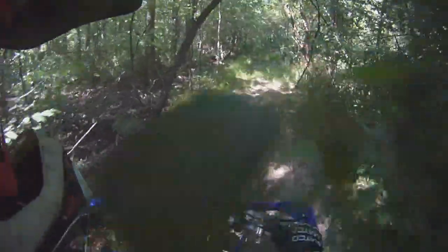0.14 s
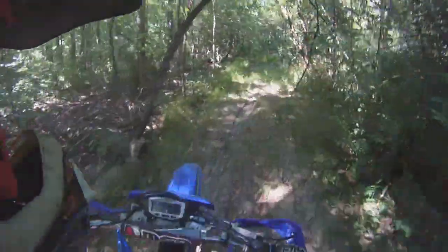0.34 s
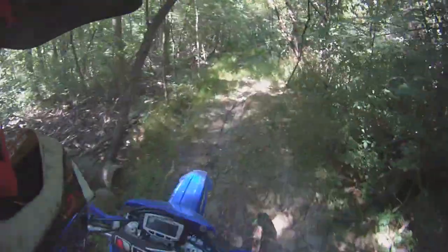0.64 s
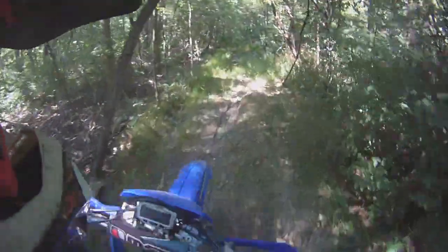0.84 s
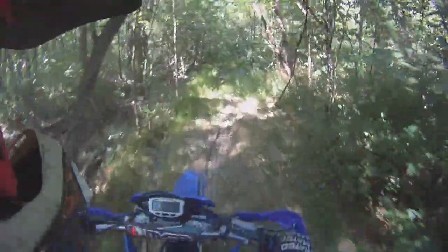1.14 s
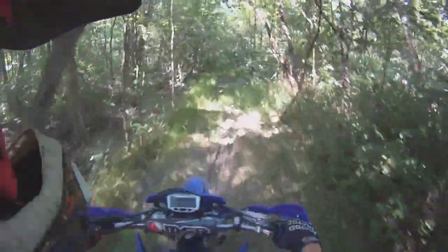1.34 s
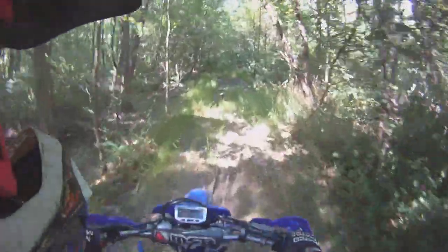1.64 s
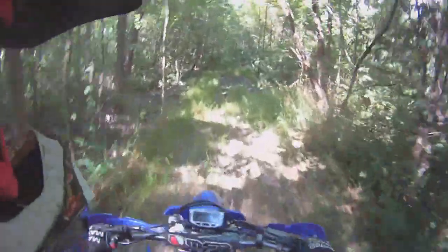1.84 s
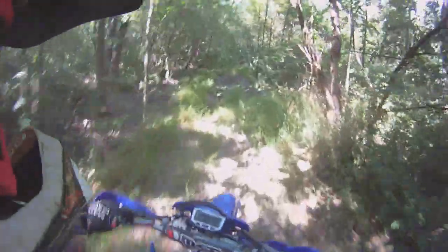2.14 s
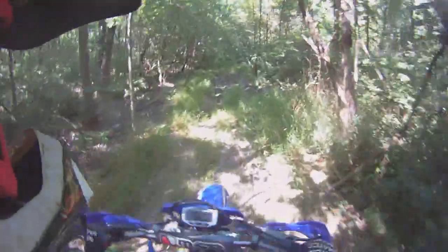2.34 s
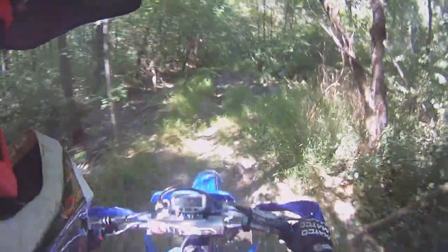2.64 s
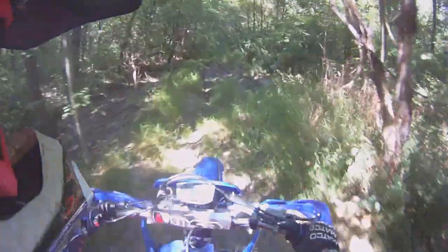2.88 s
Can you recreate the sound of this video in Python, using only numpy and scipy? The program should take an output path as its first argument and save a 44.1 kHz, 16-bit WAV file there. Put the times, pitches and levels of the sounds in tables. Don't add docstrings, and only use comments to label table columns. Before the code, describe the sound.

On a wooded trail, a dirt bike's throttle blip rises fast into a harsh clattering burr, eases, then drops to separate thudding beats with weak firings, a faint chain whine and a few light knocks; close helmet microphone.

```python
import sys
import numpy as np
from scipy import signal
from scipy.io import wavfile
from scipy.ndimage import uniform_filter1d

SR = 44100
rng = np.random.default_rng(int(sys.argv[2]) if len(sys.argv) > 2 else 0)


def nominal_scale(level):
    x = np.asarray(level, float) / 20
    return 10 ** x


def dump(signal):
    limited = np.clip(np.atleast_2d(signal).T, -1, 1)
    pcm = np.round(limited * 32767).astype(np.int16)
    wavfile.write(sys.argv[1], SR, pcm)


N = 132741


def rms_one(x):
    return x / np.sqrt(np.mean(x ** 2) + 1e-20)


def in_time(rows):
    s, *columns = np.transpose(rows)
    return [np.interp(np.arange(N) / SR, s, column) for column in columns]


def butter(x, order, hz, kind):
    return signal.sosfilt(signal.butter(order, hz, kind, fs=SR, output="sos"), x)


def resonance(x, hz, width_hz):
    r = np.exp(-np.pi * width_hz / SR)
    zeros = (1 - r * r) / 2 * np.array([1, 0, -1])
    poles = [1, -2 * r * np.cos(2 * np.pi * hz / SR), r * r]
    return signal.lfilter(zeros, poles, x + 1e-18)


def late(x, delay_s):
    return np.interp(np.arange(N) - delay_s * SR, np.arange(N), x, left=0)


def drift(rate_hz):
    r = np.exp(-2 * np.pi * rate_hz * 40 / SR)
    slow = signal.lfilter([1], [1, -2 * r, r * r], rng.standard_normal(N // 40 + 502))
    slow = rms_one(slow[500:])
    return np.interp(np.arange(N) / 40, np.arange(len(slow)), slow)


def marks(cycle, lead_s, spread_db):
    at = np.flatnonzero(np.diff(np.floor(cycle)) > 0)
    clicks = np.zeros(N)
    clicks[np.clip(at - int(lead_s * SR), 0, N - 1)] = nominal_scale(spread_db * rng.standard_normal(len(at)))
    return clicks


# start_s, firings_per_s
SPEED = [(0.0, 17.52), (0.149, 19.69), (0.292, 32.98), (0.348, 39.16), (0.453, 47.82), (0.541, 50.42),
         (0.661, 48.49), (0.894, 36.71), (1.065, 32.1), (1.337, 28.7), (1.472, 15.97), (1.518, 17.97),
         (1.835, 17.16), (1.977, 19.58), (2.348, 17.52), (2.411, 19.82), (2.445, 17.99), (3.01, 18.88)]
# start_s, clatter_db, exhaust_db, sharpness (of the thud, 0-1), ground_echo_ms
THROTTLE = [(0, -18.5, -5, 0.1, 3.9), (.13, -15, 0.5, 0.21, 3.35), (.25, -11, 3, 0.38, 4.5),
            (.4, -9.5, 2, 0.27, 3.3), (.6, -7, 1.9, 0.5, 3.57), (.78, -9.5, 0, 0.11, 3),
            (1.0, -10.5, 3, 0.49, 3.5), (1.33, -14.5, 1.7, 0.36, 3.6), (1.5, -20.5, -4, .2, 3.8),
            (2.0, -21.5, -5, 0.04, 3.7), (2.12, -22.5, -4, 0.12, 3.4), (2.4, -22, -2.5, 0.04, 3.6),
            (2.62, -18.5, -1.5, 0.16, 3.2), (3.01, -18.5, 0.3, 0.2, 3.4)]
# start_s, loss_db
MISFIRES = [
    (1.367, 5),
    (1.409, 8),
    (1.461, 12),
    (1.575, 9),
    (1.745, 4),
    (2.02, 4.5),
    (2.072, 6),
    (2.179, 5.5),
    (2.234, 11),
    (2.289, 3.5),
]


def engine():
    speed, = in_time(SPEED)
    cycle = -.277 + np.cumsum(speed) / SR
    clatter_db, exhaust_db, sharp, ground_ms = in_time(THROTTLE)
    sharp, t = np.clip(sharp, 0, 1), np.arange(N) / SR
    loss = sum(loss_db * (np.abs(t - s) < .012) for s, loss_db in MISFIRES)
    strength = nominal_scale(-loss)
    fired = marks(cycle, lead_s=.0015, spread_db=.6) * strength * nominal_scale(exhaust_db)
    pipe = exhaust(fired, sharp, speed, ground_ms / 1000)
    return pipe + nominal_scale(clatter_db) * clatter(cycle, strength, sharp)


def thud(clicks, hz, width_hz, level_db, delay_s):
    for _ in range(3):
        clicks = resonance(clicks, hz, width_hz)
    return -nominal_scale(level_db) * late(clicks, delay_s) * SR / width_hz


# hz, width_hz, level_db, delay_s, ground_gain, return_gain, second_return_gain
SOFT_THUD = (250, 390, -13.5, 0, .37, -.65, .27)
SHARP_THUD = (250, 720, -10, .0005, .65, -1.25, .42)


def exhaust(fired, sharp, speed, ground_s):
    fast = (speed / speed.max()) ** 4
    hot = 1 - .2 * (speed - speed.min()) / np.ptp(speed) * (1 - fast)
    header = thud(fired * fast, hz=620, width_hz=190, level_db=-19, delay_s=.005)
    airbox = thud(fired * fast, hz=190, width_hz=290, level_db=-16, delay_s=.0043)
    bark = thud(fired * fast, hz=880, width_hz=420, level_db=-12.5, delay_s=.002)
    boom = thud(fired * (1 - 1.5 * sharp), hz=62, width_hz=192, level_db=-25.5, delay_s=.002)
    push = thud(fired * sharp * (1 - fast), hz=164.5, width_hz=134, level_db=-18, delay_s=.002)
    out = header + airbox + bark - boom - push
    for share, (*voice, ground, back, again) in ((1 - sharp, SOFT_THUD), (sharp, SHARP_THUD)):
        direct = thud(fired * share, *voice)
        out += direct + ground * late(direct, ground_s)
        out += back * late(direct, .0056 * hot) + again * late(direct, .0106 * hot)
        out += -.9 * fast * late(direct, .0067)
    return out - sharp * (1 - fast) * butter(out, 2, 95, "low")


# pitch_hz, level_db (per Hz)
CLATTER = [
    (60, -7),
    (300, -5),
    (700, -13),
    (1300, -8),
    (2300, -17.5),
    (6000, -16.5),
    (9500, -47),
    (15000, -34),
]
# pitch_hz, width_hz, boost_db
BODY = [
    (626, 67, 5),
    (880, 320, 2.5),
    (1452, 73, 11.5),
    (1824, 31, 8.5),
    (3090, 174, 9.5),
    (3814, 170, 2.5),
    (4620, 145, 4),
    (4920, 100, 3),
    (5990, 540, 10.5),
    (7500, 240, 4),
]
# start_s, level_db (above 2.5 kHz)
INTAKE = [
    (0, -2.5),
    (.3, -0.5),
    (.6, 1.2),
    (.8, 2),
    (1.05, 2),
    (1.3, 0),
    (1.6, -0.9),
    (2.1, 1.2),
    (2.4, -.5),
    (3.01, -1.3),
]


def clatter(cycle, strength, sharp):
    beats = .95 * strength * marks(cycle, 0, spread_db=2.5) + .2 * marks(cycle + .5, 0, spread_db=2.5)
    decay = np.exp(-1 / (.009 * SR))
    gate = 1 + signal.lfilter([1], [1, -decay], uniform_filter1d(beats, size=80))

    ticks_per_s, tick_db, patchy_db = 1500, -2.5, .94
    ticks = (rng.random(N) < ticks_per_s / SR) * rng.standard_normal(N)
    ticks = ticks * nominal_scale(1.94 * rng.exponential(1, N))
    white = rng.standard_normal((2, N)) + nominal_scale(tick_db) * rms_one(ticks)

    out, together = 0, drift(8.0)
    edges = 45 * 2 ** np.arange(0, 8.6, .5)
    hz, level_db = np.transpose(CLATTER)
    for k, (low, high) in enumerate(zip(edges, edges[1:])):
        band = butter(white[k % 2], 2, [low, high], "band")
        colour_db = np.interp(np.log(low * high) / 2, np.log(hz), level_db)
        out = out + band * nominal_scale(colour_db + patchy_db * (.72 * together + drift(27.6)))

    for hz, width_hz, boost_db in BODY:
        out = out + (nominal_scale(boost_db) - 1) * resonance(out, hz, width_hz)
    intake_db, = in_time(INTAKE)
    out += (nominal_scale(intake_db) - 1) * butter(out, 2, 2500, "high")
    out += (nominal_scale(-10 * sharp) - 1) * resonance(out, 750.0, 600.0)
    return butter(rms_one(gate) * rms_one(out), 4, 560, "high")


# start_s, peak_db, ring_t60_s, pitch_hz
KNOCKS = [(0.0302, 4, 0.019, 1450), (0.04, 7.5, 0.063, 1395), (.043, -10.5, 0.065, 845),
          (.058, 2.5, 0.0067, 1600), (0.075, -3, 0.078, 1490), (0.153, -7, .008, 4000),
          (0.186, 0.5, 0.055, 1480), (0.207, -1, 0.17, 1370), (.238, 2, 0.059, 1780), (.255, 0, 0.11, 1740),
          (0.272, 0, 0.11, 1540), (0.311, -1, 0.017, 1450), (.34, 0.5, 0.042, 1600),
          (.358, -1.5, 0.033, 3770), (.388, -3.5, 0.067, 1380), (2.217, -15, 0.033, 815),
          (2.403, -11, 0.022, 1460), (2.567, -9, 0.052, 1480)]


def knocks():
    out, t = np.zeros(N + SR), np.arange(SR // 8) / SR
    for s, peak_db, t60, hz in KNOCKS:
        puff = rng.standard_normal(len(t)) * nominal_scale(-60 * t / t60)
        width_hz = hz / 5 if hz > 1000 else hz / 10
        ring = resonance(resonance(puff, hz, width_hz), hz, hz / 2)
        if hz > 1000:
            ring += .34 * resonance(resonance(puff, .584 * hz, 370.0), .54 * hz, 390.0)
        crack = nominal_scale(-21) * resonance(puff, 2300.0, 2100.0)
        start = int(s * SR)
        out[start:start + len(t)] += nominal_scale(peak_db) * (ring / np.abs(ring).max() + crack)
    return out[:N]


# start_s, length_s, level_db
LEAVES = [
    (0.043, 0.08, -34.5),
    (0.15, 0.057, -29),
    (0.206, .075, -30.5),
    (0.33, 0.053, -23),
    (2.0, 0.021, -37),
    (2.224, 0.042, -33),
    (2.637, .03, -37),
]


def leaves():
    t, shape = np.arange(N) / SR, 0
    for s, length, level_db in LEAVES:
        shape = shape + nominal_scale(level_db) * np.sin(np.pi * np.clip((t - s) / length, 0, 1)) ** .5
    crackle = rng.standard_normal(N) * nominal_scale(2.4 * drift(150.0))
    return shape * rms_one(butter(crackle, 1, [4000, 11000], "band"))


def chain_whine():
    start, end, t = 1.45, 2.05, np.arange(N) / SR
    swell = np.clip((t - start) / (end - start), 0, 1) ** .5 * np.clip((end - t) / .027, 0, 1)
    tone = resonance(resonance(rng.standard_normal(N), 5100, 160), 5100, 160)
    return nominal_scale(-30) * swell * rms_one(tone)


def tyre_rumble():
    clatter_db = in_time(THROTTLE)[0]
    rumble = resonance(resonance(rng.standard_normal(N), 220.0, 500.0), 220.0, 500.0)
    return rms_one(rumble) * nominal_scale(-37 + .16 * (clatter_db + 24) + 1.3 * drift(12.0))


def scene():
    return (engine() + knocks() + leaves() + chain_whine() + tyre_rumble())[None]


def roll_off(x):
    return signal.sosfilt(signal.butter(12, 15600, fs=SR, output="sos"), x)


def record(dry):
    x = butter(dry, 2, 40, "high")
    x = x / (1 + np.abs(x) ** 16) ** (1 / 16)
    x = signal.sosfilt(signal.cheby2(10, 45, 15900, fs=SR, output="sos"), x)
    return roll_off(x)


dry = scene()
out = record(dry)
dump(out)
```